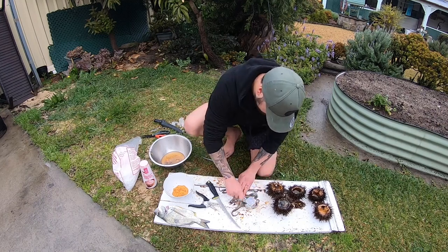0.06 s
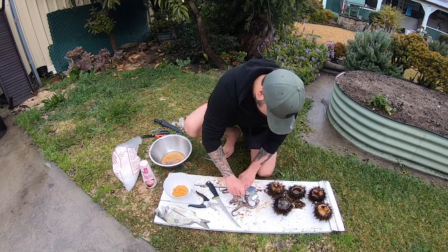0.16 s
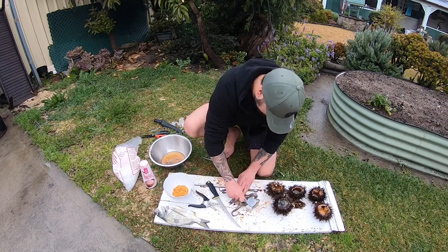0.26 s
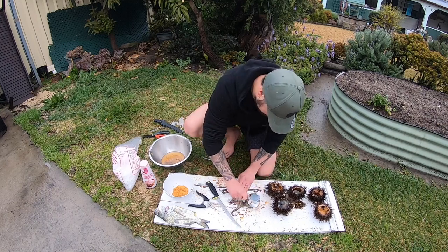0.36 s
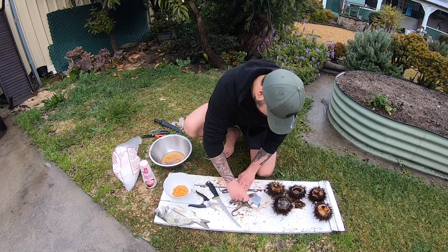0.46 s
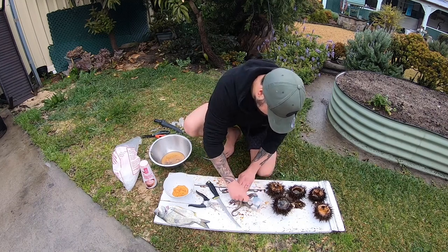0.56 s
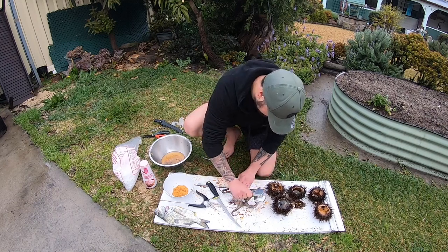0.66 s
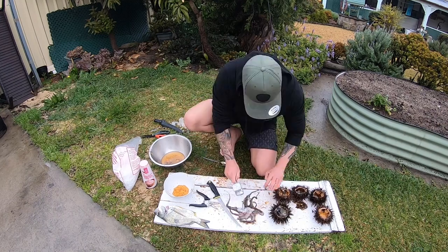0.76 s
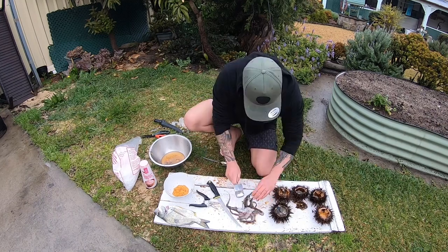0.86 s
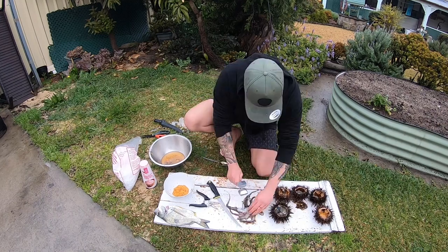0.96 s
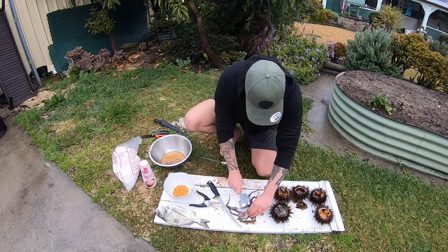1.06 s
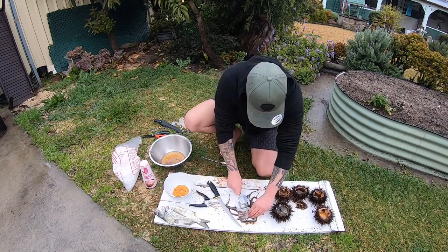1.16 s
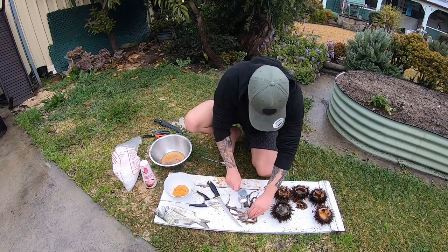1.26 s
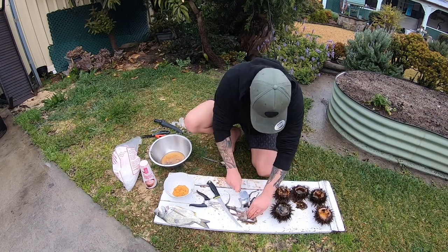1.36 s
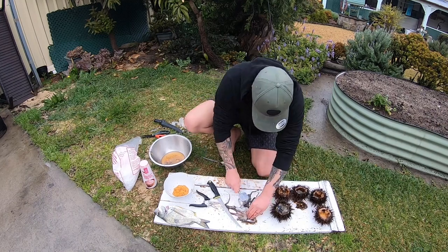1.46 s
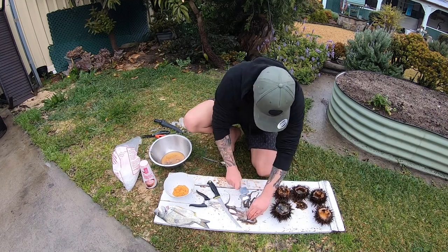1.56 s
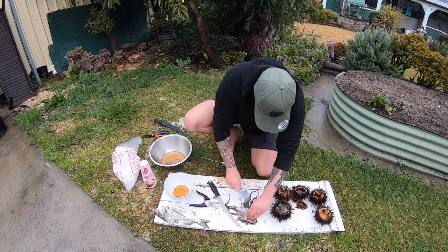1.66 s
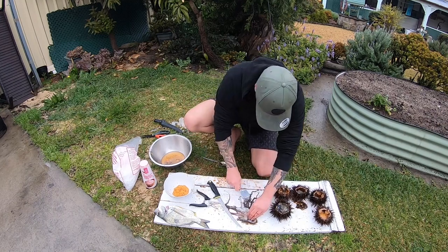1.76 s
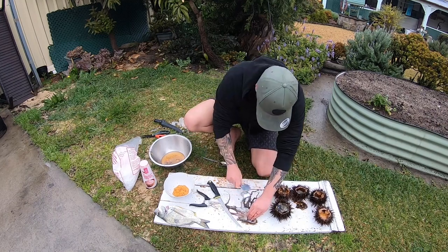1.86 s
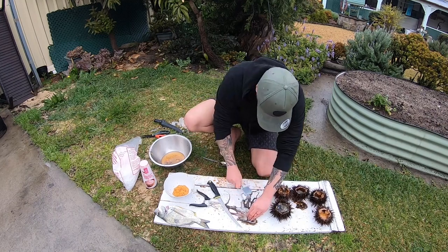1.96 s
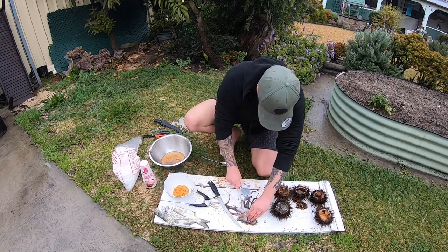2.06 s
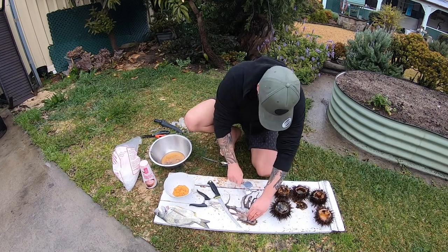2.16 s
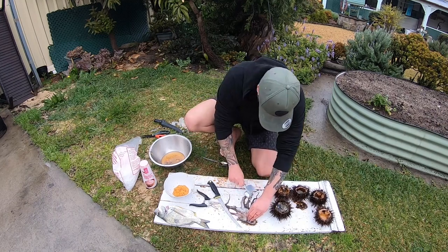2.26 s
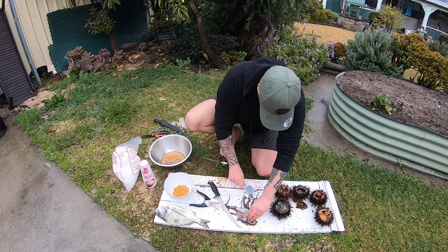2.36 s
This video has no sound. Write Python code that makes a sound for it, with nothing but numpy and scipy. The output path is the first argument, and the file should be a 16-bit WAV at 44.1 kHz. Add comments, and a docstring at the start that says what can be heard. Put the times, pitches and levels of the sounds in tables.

```python
"""A faint garden hush, then almost at once the first of seven blows on a raw octopus on a plastic board.
Each blow is a heavily damped swing (a dead thump) plus a burst of tiny clicks (a wet splat).
The board, a set of fading tones, chatters and slaps the lawn; after three blows the grip shifts in a pause.
Loose arms flop back as soft smacks. Scattered echoes stand for the fence and house.
Behind lie filtered noise for the garden, puffs of wind and thin high chirps."""
import sys
import numpy as np
from scipy import signal
from scipy.fft import rfft, irfft
from scipy.io import wavfile

SR = 44100
rng = np.random.default_rng(int(sys.argv[2]) if len(sys.argv) > 2 else 0)


def store_pcm(level_fs):
    """Save levels as 16-bit WAV."""
    pcm = np.round(np.clip(level_fs, -1, 1) * 32767).astype(np.int16)
    wavfile.write(sys.argv[1], SR, np.atleast_2d(pcm).T)


N = 105840  # samples, 2.4 s

# blows: start_s, thump_db, thump_pitch_hz, clack_db, splat_db, chatter_db, rebound_delay_s, slap_db
BLOWS = [(0.1208, 0, 319, -17.5, 0.5, -1, 0.016, 5.5), (0.3701, -1.5, 329.4, -31.5, 0, 2, 0.015, 0),
         (0.6121, -2.5, 339, -9, -3, -0.5, 0.01, 2.5), (1.211, -6, 291, -9, 2.5, 5, 0.013, 2),
         (1.5165, -1.5, 306, -13, 2.5, 2, 0.014, 4.5), (1.8076, -2, 329.4, -32.5, 0.5, 5.5, 0.013, 3),
         (2.1104, -5.5, 275, -3, -1.5, -1, 0.015, -4.5)]
# light knocks of hand and flesh settling on the board: start_s, thud_db, pitch_hz, wet_tick_db
KNOCKS = [(.724, -33, 557, -39), (0.797, -32, 361, -17), (.816, -30, 214, -29), (.844, -30, 356, -29.5),
          (0.856, -37.5, 204, -27.5), (0.984, -38.5, 322, -41.5), (1.288, -24.5, 387, -18),
          (1.882, -31.5, 385, -15), (1.906, -27, 400, -33)]
# loose arms flopping back onto the board: start_s, smack_db, squelch_hz, squelch_db
FLOPS = [(.169, -26, 1500, -32), (.4205, -25, 1650, -23), (.665, -27, 640, -28), (1.907, -29, 700, -32)]
# tones the board rings at: pitch_hz, time_to_fade_60_db_s, level_db
BOARD_TONES = [(178, 0.061, -1.5), (219.7, 0.15, -4), (340, 0.082, -12.5), (405, 0.046, 8), (398, 0.08, 2),
               (465.4, 0.12, -7.5), (730, 0.08, -7.5), (828, 0.092, -8.5), (1014, .035, -7),
               (1356, 0.056, -18), (1510, 0.031, -7), (1864, 0.031, -15.5), (2100, 0.026, -28),
               (2820, 0.055, -14.5)]
# tone colour of the wet splat: pitch_hz, level_db
SPLAT_COLOUR = [(200, -21), (600, 14), (1300, -4), (2600, -2.5), (4000, -8.5), (6000, -16), (8500, -22),
                (10500, -37), (15000, -49)]
# how much the splat's left-right difference exceeds its middle: pitch_hz, level_db
SPLAT_SIDE = [(1000, -6), (3000, -9.5), (5500, -6), (8000, 4.5)]
# tone colour of the board slapping the ground: pitch_hz, level_db
SLAP_COLOUR = [(60, -48), (170, -3.5), (380, 11.5), (600, -11), (820, 7), (1500, -2), (2100, -10),
               (3000, -15.5), (4500, -38), (8000, -41.5), (15000, -79.5)]
# tone colour of the flopping arms: pitch_hz, level_db
FLOP_COLOUR = [(120, -26.5), (400, 24), (700, 8), (1600, -3), (2300, -21), (3300, -17.5), (6000, -43.5),
               (9000, -65.5), (15000, -48.5)]
# yard echo in bands: pitch_hz, level_db, time_to_fade_60_db_s
YARD_BANDS = [(80, -14, .3), (157, -20, 0.53), (266, -20.5, 0.19), (397, -12, 0.25), (600, -14, 0.52),
              (1110, -9, 0.24), (2320, -11.5, 0.3), (5100, -13, 0.31), (8850, -5.5, 0.28),
              (15000, -28, .25)]
# how much louder the right side is than the left: pitch_hz, level_db
RIGHT_LEAN = [(60, -1), (300, 0.55), (450, 1), (700, 4.5), (1400, 4), (3000, 2.5), (6000, 2), (10000, 1)]
# tone colour of the garden wash: pitch_hz, level_db
GARDEN_COLOUR = [(15, -49), (25, -9.5), (87, 0.5), (283, -6), (354, -10), (432, -6), (749, -9.5),
                 (828, -5.5), (1060, -7), (2040, -21.5), (2200, -22), (2680, -24), (3810, -37.5),
                 (6760, -46), (9840, -58), (12800, -101.5), (21600, -120)]
# slow rise and fall of the background level: time_s, level_db
GARDEN_LEVEL = [(0, 1.5), (.55, -1), (.9, 0.5), (1.15, -1.5), (1.7, 2), (2.05, 0), (2.35, -1)]
# puffs of wind: centre_s, half_width_s, level_db
GUSTS = [(0.12, 0.061, -37), (0.219, 0.017, -27), (0.597, 0.037, -38.5), (0.977, 0.033, -47)]
# faint chirps: centre_s, half_width_s, pitch_hz, level_db
CHIRPS = [(.09, .03, 6700, -77.5), (.34, .025, 6700, -86), (.89, .025, 6700, -73.5),
          (1.045, .025, 6700, -80), (1.19, .025, 6700, -77), (1.36, .025, 6700, -73),
          (1.65, .025, 3560, -66), (1.67, .025, 6700, -72.5), (1.98, .025, 6700, -82),
          (2.056, 0.063, 3600, -66), (2.3, .035, 2950, -65)]

# "rise" is the time to the peak in seconds; a higher "sharp" makes a narrower pulse
THUMP_RISE_S, THUMP_SHARP = 0.0047, 14.1
CLACK_HZ, CLACK_RISE_S, CLACK_SHARP = 685, 0.003025, 22.4
KNOCK_RISE_S = 0.0035

RING_DB = -31
CHATTER_DB, CHATTER_SHARP, CHATTER_PER_S = -19, 7.6, 800
SLAP_DB, REBOUND_SHARP, SLAPS_PER_S = -21.5, 11, 2500
CONTACT_S = 0.000086  # grass cushions each touch of the board

SPLAT_DB, SPLAT_RISE_S, SPLAT_DECAY_S = -28, 0.00044, 0.015  # here "rise" is a time constant
DROPS_PER_S, DROP_SPREAD_DB = 4000, 1
CRACK_RISE_S, CRACK_GAIN = 0.0014, 0.78
FLOP_RISE_S, SQUELCH_RISE_S = 0.0025, 0.0031

YARD_BUILD_S, ECHOES_PER_S, YARD_WIDTH = 0.03, 4000, 0.47
FENCE_S, FENCE_GAIN, HOUSE_S, HOUSE_GAIN, ECHO_WIDTH_S = 0.05, 0.26, 0.095, 1, 0.0069

GARDEN_DB, GARDEN_WIDTH, GARDEN_WAVER_DB = -48, 0.39, -3.5
CHIRP_WARBLE = 0.032  # typical pitch wobble, as a share of the pitch
LOW_CUT_HZ, TOP_HZ = 143, 15500


def undb(db):
    """Turns decibels into a plain multiplier."""
    return 10 ** (np.asarray(db) / 20)


def unit(x):
    """Scales a signal to an average (RMS) strength of 1."""
    return x / np.sqrt(np.mean(x ** 2))


def on_bins(hz, values):
    """Joins values along a log-pitch axis, one result for each frequency step of the sound."""
    bin_hz = np.arange(N // 2 + 1) * SR / N
    return np.interp(np.log(np.maximum(bin_hz, 1)), np.log(hz), values)


def table_db(points):
    """Reads a two-column table of pitch and level as a smooth level curve."""
    return on_bins(*np.array(points, float).T)


def colour(x, points):
    """Filters with a tone colour of unit power, never sounding before its input."""
    gain = unit(undb(table_db(points)))
    # folding the cepstrum forward in time gives the filter minimum phase
    cepstrum = irfft(np.log(gain), N)
    cepstrum[1:N // 2] *= 2
    cepstrum[N // 2 + 1:] = 0
    return irfft(rfft(x) * np.exp(rfft(cepstrum)), N)


def since(start):
    """Seconds passed since the start, zero before it."""
    return np.maximum(np.arange(N) / SR - start, 0)


def swell(age, peak, sharp):
    """Rises to 1 at the peak time, then dies."""
    return (age / peak * np.exp(1 - age / peak)) ** sharp


def bump(centre, width):
    """A smooth bell-shaped hill in time."""
    return np.exp(-((since(0) - centre) / width) ** 2)


def spread(mid, side, width):
    """Makes stereo by adding the side signal on the left and taking it away on the right."""
    return mid + width * side * np.array([[1], [-1]])


def clicks(rate, spread_db):
    """Random tiny impacts of uneven size."""
    size = undb(spread_db * rng.standard_normal(N)) * np.sign(rng.standard_normal(N))
    return unit(size * (rng.random(N) < rate / SR))


def slow_noise(hz):
    """Noise whose movement above the given rate is smoothed away."""
    low_pass = signal.butter(2, hz, fs=SR, output="sos")
    return unit(signal.sosfilt(low_pass, rng.standard_normal(N)))


def thud(start, hz, rise, sharp):
    """A heavily damped swing that dies very quickly."""
    age = since(start)
    return swell(age, rise, sharp) * np.cos(2 * np.pi * hz * (age - rise))


def thumps():
    """The padded thump of each blow, a clack where it reaches the board, and the light knocks."""
    out = np.zeros(N)
    for start, thump_db, hz, clack_db, *_ in BLOWS:
        out += undb(thump_db) * thud(start, hz, THUMP_RISE_S, THUMP_SHARP)
        out -= undb(clack_db) * thud(start, CLACK_HZ, CLACK_RISE_S, CLACK_SHARP)
    for start, thud_db, hz, _ in KNOCKS:
        out += undb(thud_db) * thud(start, hz, KNOCK_RISE_S, 1.5)
    return out


def splats():
    """Wet flesh cracks on contact, then bursts into a quickly thinning spray of tiny clicks."""
    wet = np.zeros(N)
    wet_hits = [(row[0], row[4]) for row in BLOWS] + [(row[0], row[3]) for row in KNOCKS]
    for start, db in wet_hits:
        age = since(start)
        spray = (1 - np.exp(-age / SPLAT_RISE_S)) * np.exp(-age / SPLAT_DECAY_S)
        crack = CRACK_GAIN * swell(age, CRACK_RISE_S, 0.69)
        wet += undb(db) * (spray + crack)
    mid, side = (colour(wet * clicks(DROPS_PER_S, DROP_SPREAD_DB), SPLAT_COLOUR) for _ in range(2))
    side = irfft(rfft(side) * undb(table_db(SPLAT_SIDE)), N)
    return undb(SPLAT_DB) * spread(mid, side, 0.9)


def board_ring(age):
    """One touch sets off all the board's fading tones, each slightly and randomly off pitch."""
    hz, t60, db = np.array(BOARD_TONES).T[:, :, None]
    detune = 1 + 0.022 * rng.standard_normal(hz.shape)
    fade = np.exp(-np.log(1000) * age / t60)
    ring = (undb(db) * fade * np.sin(2 * np.pi * hz * detune * age)).sum(0)
    return ring * (1 - np.exp(-(age / CONTACT_S) ** 2))


def board():
    """The blow rings the board; it springs back, chatters and slaps the ground."""
    out, slapping = np.zeros(N), np.zeros(N)
    age = since(0)[:N // 8]
    for start, *_, chatter_db, rebound, slap_db in BLOWS:
        ring = board_ring(age)
        contact = swell(since(start), rebound, CHATTER_SHARP)
        touches = contact * clicks(CHATTER_PER_S, spread_db=5.5)
        rattle = signal.fftconvolve(touches, ring)[:N]
        # match the rattle's energy to the contact before setting its level
        rattle *= undb(CHATTER_DB) * np.sqrt(np.sum(contact ** 2) / np.sum(rattle ** 2))
        struck = undb(RING_DB) * np.interp(since(start + THUMP_RISE_S), age, ring, right=0)
        out += undb(chatter_db) * (rattle + struck)
        slapping += undb(slap_db) * swell(since(start), rebound, REBOUND_SHARP)
    mid, side = (colour(slapping * clicks(SLAPS_PER_S, spread_db=6), SLAP_COLOUR) for _ in range(2))
    return out + undb(SLAP_DB) * spread(mid, side, 0.18)


def flops():
    """Short soft smacks just after some blows, each squeezing out a pocket of air."""
    contact, squelch = np.zeros(N), np.zeros(N)
    for start, smack_db, hz, squelch_db in FLOPS:
        contact += undb(smack_db) * swell(since(start), FLOP_RISE_S, 0.53)
        squelch += undb(squelch_db) * thud(start, hz, SQUELCH_RISE_S, 9)
    return colour(contact * clicks(DROPS_PER_S, spread_db=-2.5), FLOP_COLOUR) + squelch


def yard(x):
    """Scattered echoes, thicker where fence and house answer, fading at their own pace in each band."""
    age = since(0)
    hz = [row[0] for row in YARD_BANDS]
    build = swell(np.minimum(age, YARD_BUILD_S), YARD_BUILD_S, 0.99)  # rises, then holds
    fence = FENCE_GAIN * bump(FENCE_S, ECHO_WIDTH_S)
    house = HOUSE_GAIN * bump(HOUSE_S, ECHO_WIDTH_S)
    shape = build * (1 + fence + house)
    mid, side = (clicks(ECHOES_PER_S, spread_db=3) for _ in range(2))
    scatter = rfft(spread(mid, side, YARD_WIDTH))
    response = np.zeros((2, N))
    # each row of the identity matrix picks out one band, blending into its neighbours
    for share, (_, db, t60) in zip(np.eye(len(YARD_BANDS)), YARD_BANDS):
        fade = shape * np.exp(-np.log(1000) * age / t60)
        band = irfft(scatter * on_bins(hz, share), N)
        response += undb(db) * band * fade / np.sqrt(np.sum(fade ** 2))
    return signal.fftconvolve(x[None], response[:, :N // 3], axes=1)[:, :N]


def garden_air():
    """Distant outdoor wash: coloured noise whose level wavers."""
    level_db = GARDEN_DB + np.interp(since(0), *np.array(GARDEN_LEVEL).T)
    level_db = level_db + GARDEN_WAVER_DB * slow_noise(4.1)
    mid, side = colour(rng.standard_normal((2, N)), GARDEN_COLOUR)
    return spread(mid, side, GARDEN_WIDTH) * undb(level_db)


def wind():
    """Puffs of low rumbling noise, separate on left and right."""
    puffs = sum(undb(db) * bump(centre, width) for centre, width, db in GUSTS)
    return puffs * np.array([slow_noise(55), slow_noise(76)])


def chirps():
    """Thin short tones whose pitch trembles."""
    warbled_time = np.cumsum(1 + CHIRP_WARBLE * slow_noise(150)) / SR
    out = np.zeros(N)
    for centre, width, hz, db in CHIRPS:
        out += undb(db) * bump(centre, width) * np.sin(2 * np.pi * hz * warbled_time)
    return out


def scene():
    """Adds the yard echo to the blows, leans them to the right, and lays the garden behind."""
    # deep bass is cut away below the low-cut pitch
    low_cut = signal.butter(2, LOW_CUT_HZ, "high", fs=SR, output="sos")
    direct = signal.sosfilt(low_cut, thumps() + splats() + board() + flops())
    heard = direct + yard(direct.mean(0))
    lean_db = table_db(RIGHT_LEAN)
    leaned = irfft(rfft(heard) * undb(np.array([-lean_db, lean_db]) / 2), N)
    return leaned + garden_air() + wind() + chirps()


def record(dry):
    """Flattens peaks at full scale, then cuts the highest treble."""
    top_cut = signal.ellip(8, 0.2, 70, TOP_HZ, fs=SR, output="sos")
    return signal.sosfilt(top_cut, np.clip(dry, -1, 1))


dry = scene()
out = record(dry)
store_pcm(out)
```